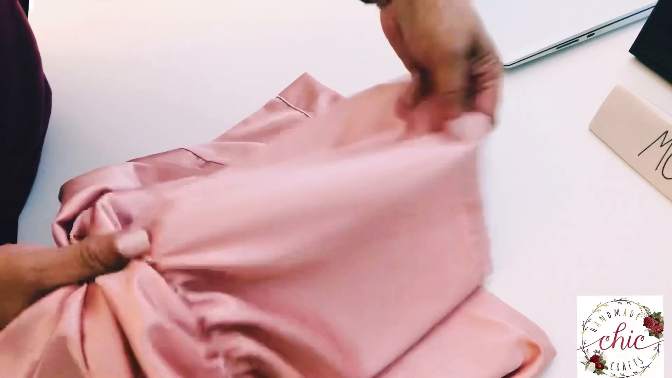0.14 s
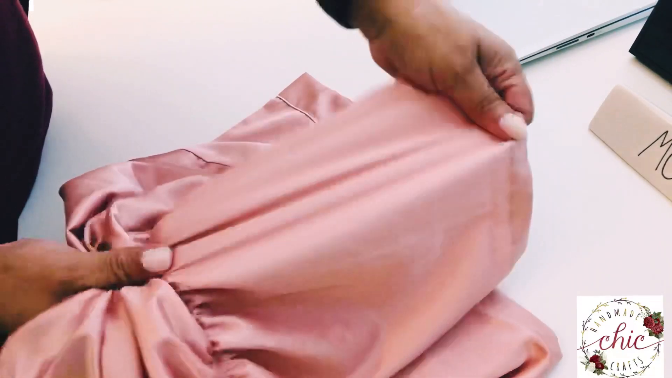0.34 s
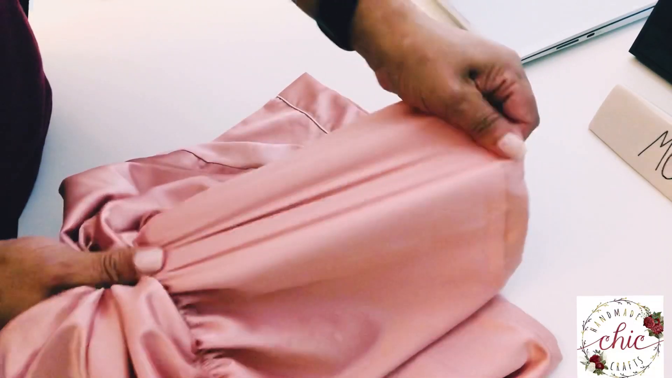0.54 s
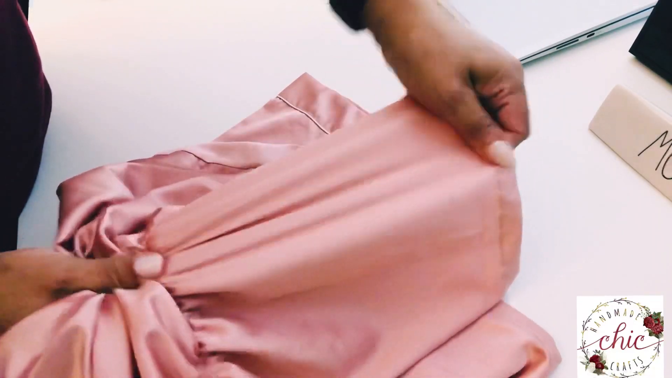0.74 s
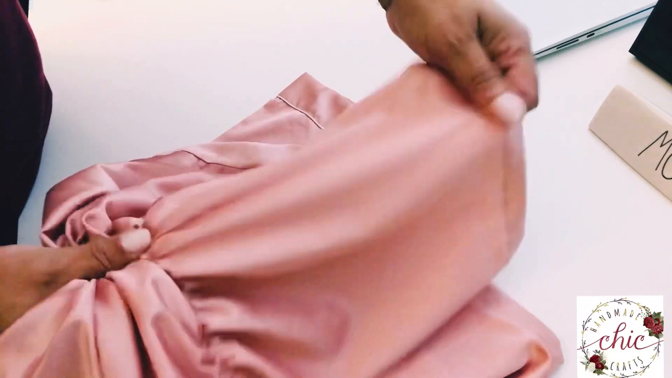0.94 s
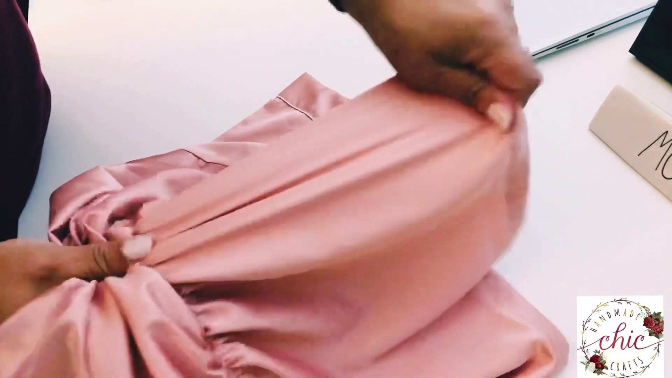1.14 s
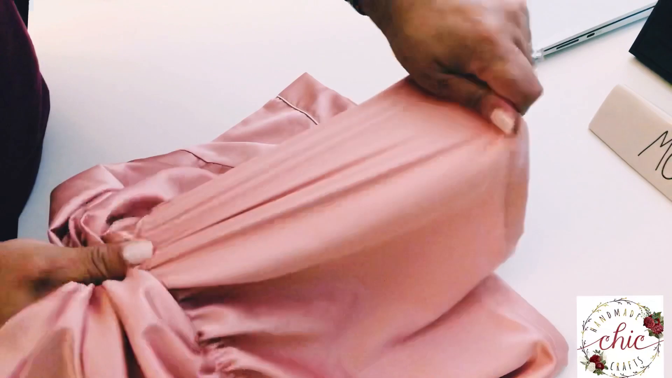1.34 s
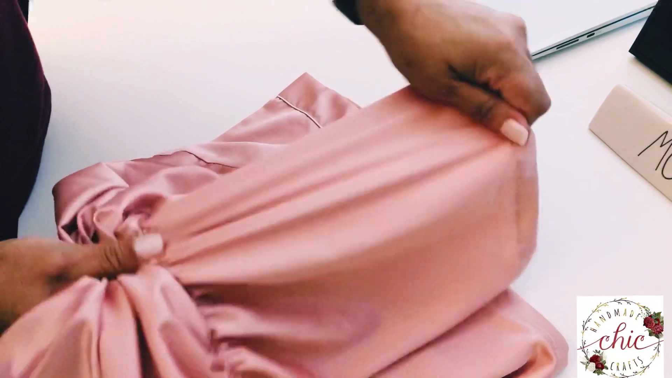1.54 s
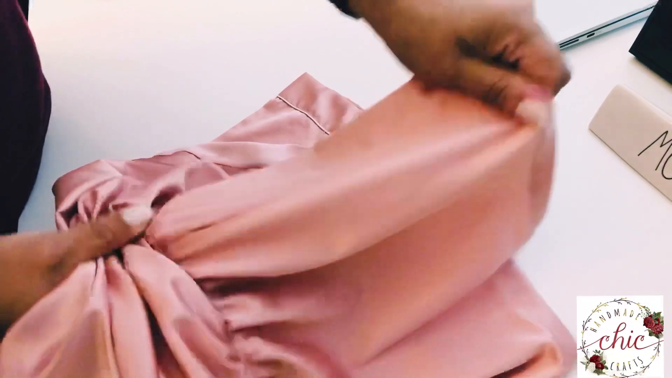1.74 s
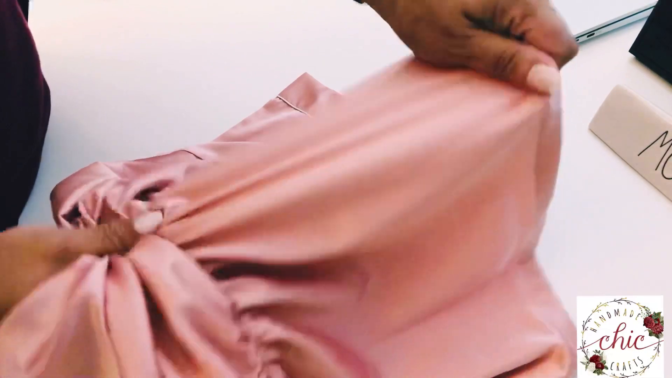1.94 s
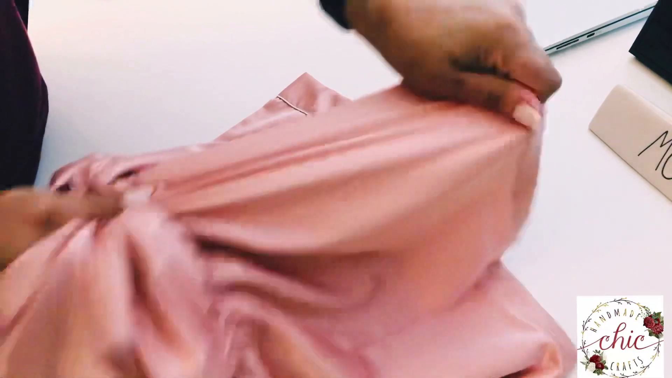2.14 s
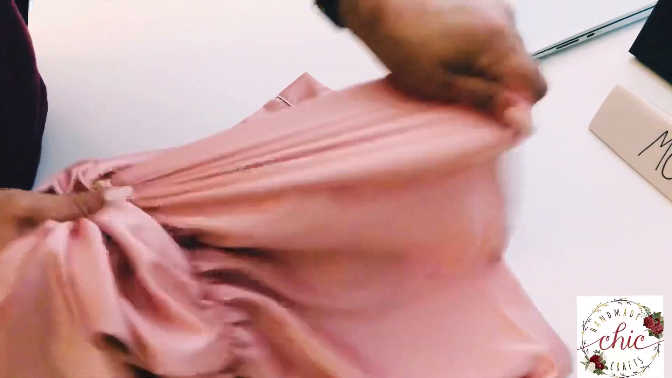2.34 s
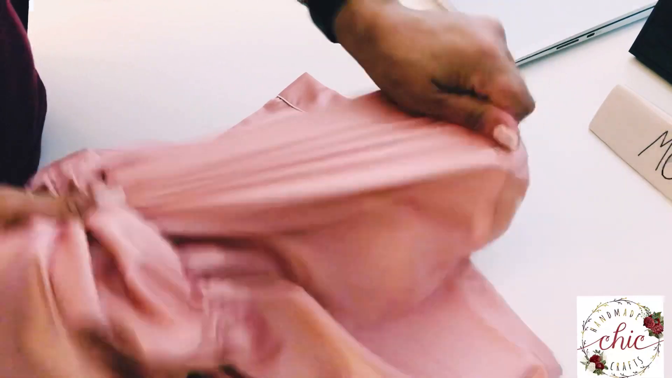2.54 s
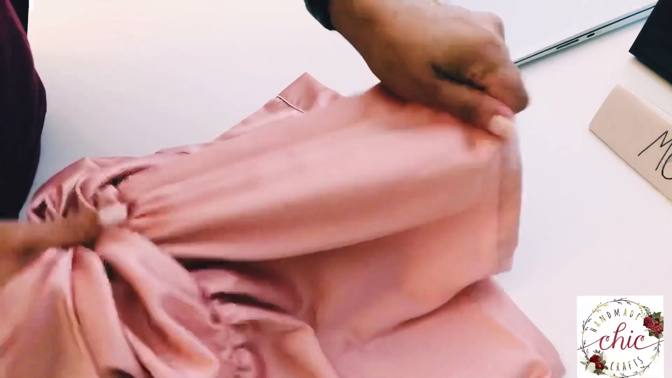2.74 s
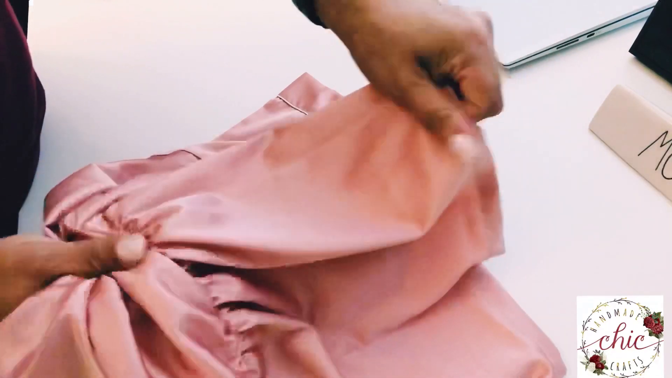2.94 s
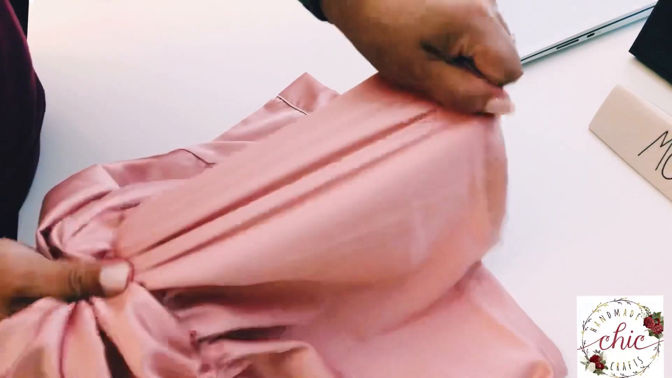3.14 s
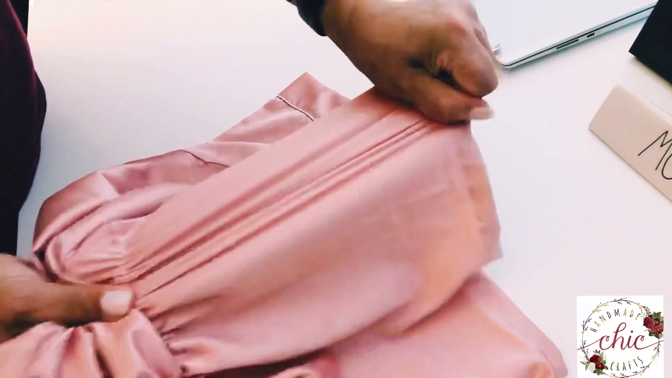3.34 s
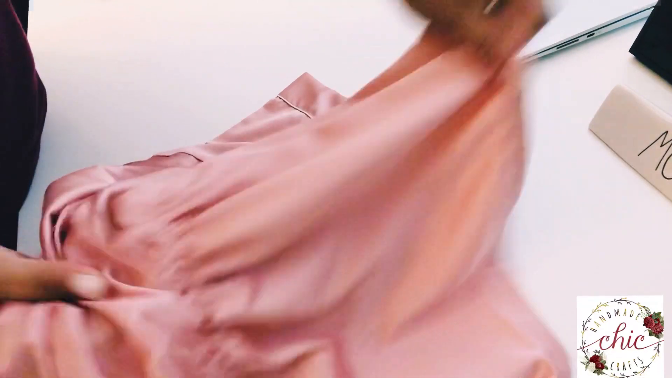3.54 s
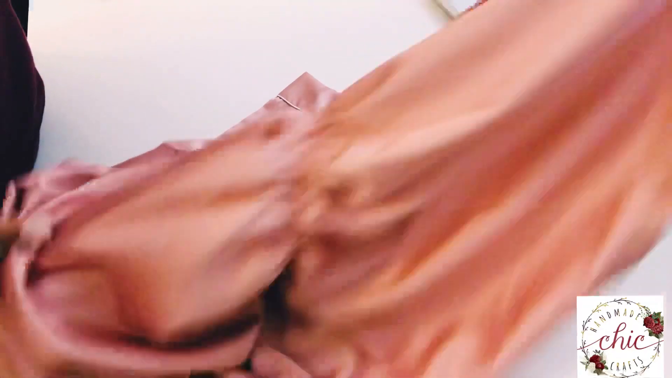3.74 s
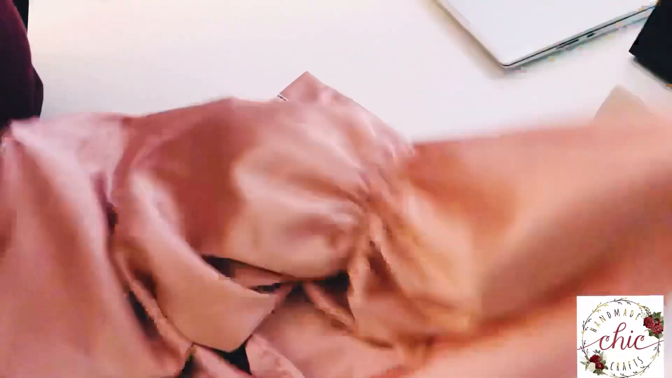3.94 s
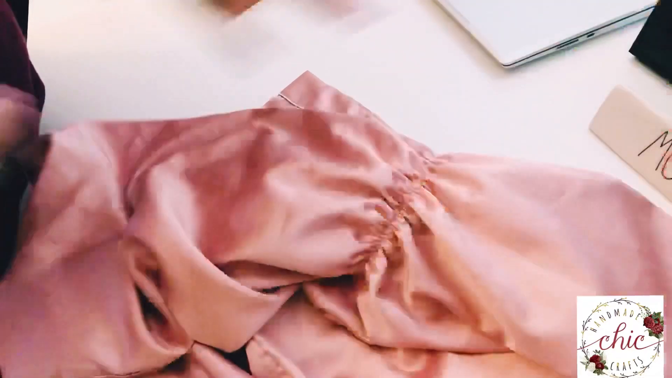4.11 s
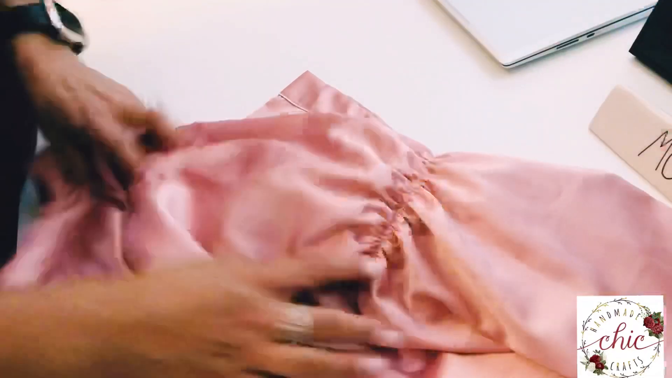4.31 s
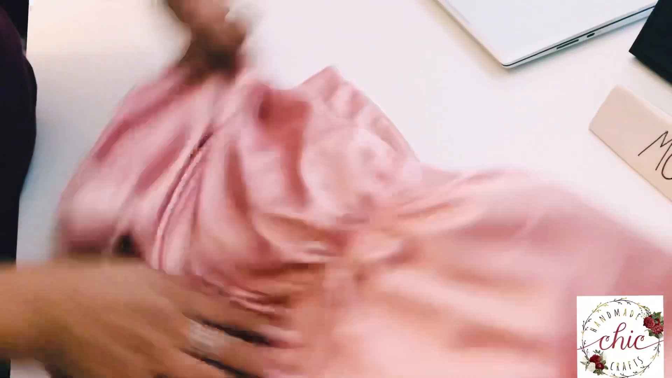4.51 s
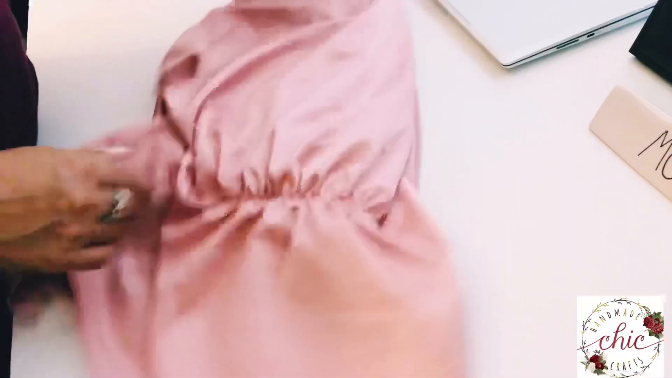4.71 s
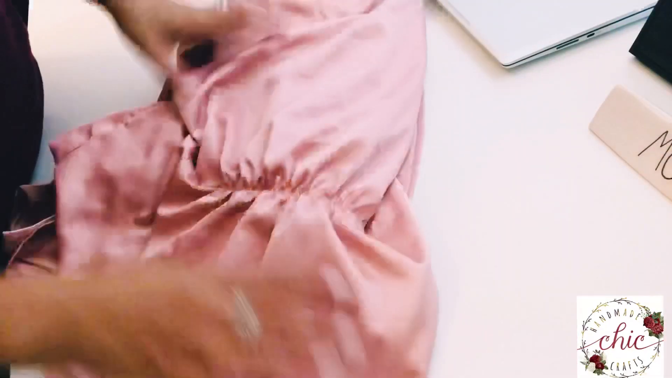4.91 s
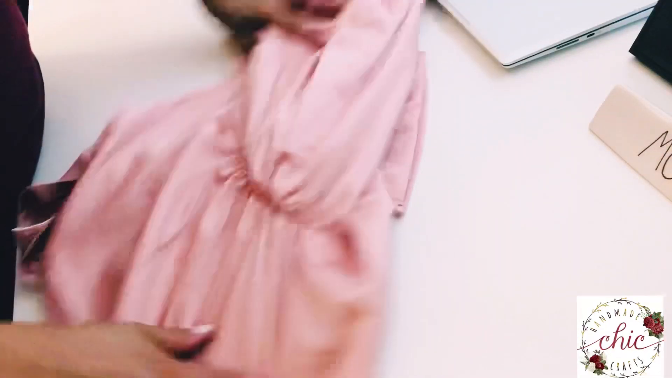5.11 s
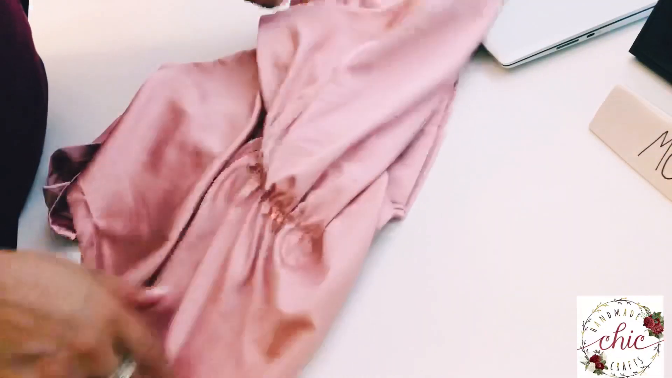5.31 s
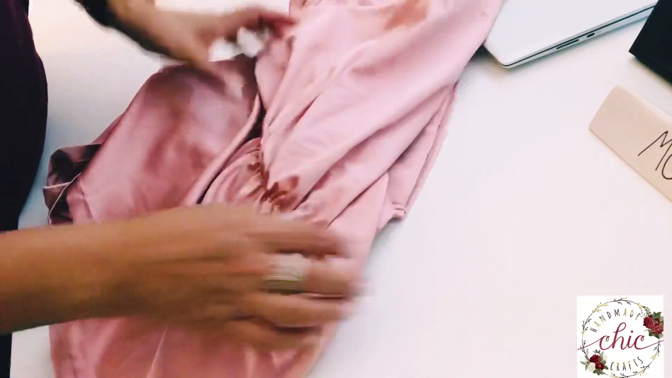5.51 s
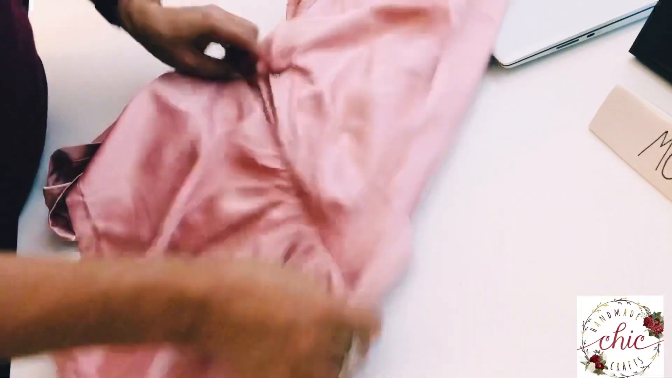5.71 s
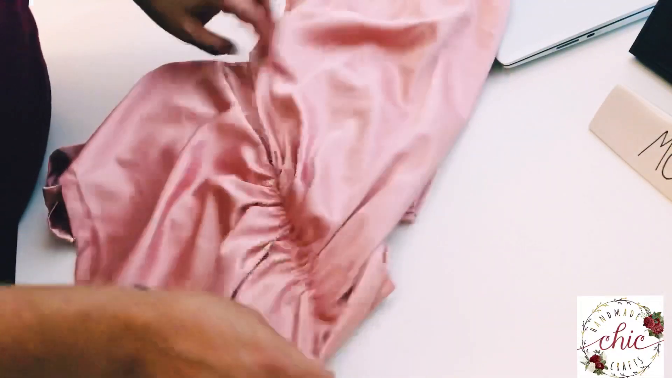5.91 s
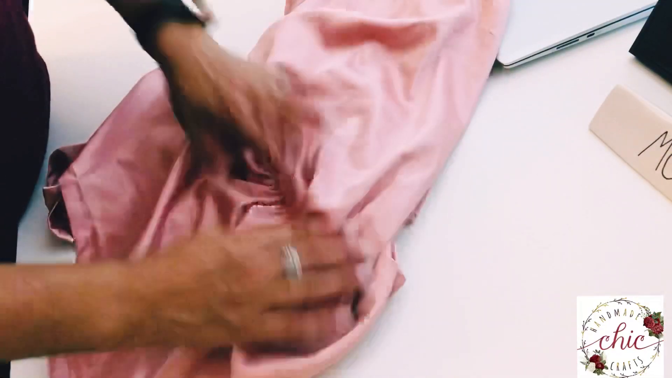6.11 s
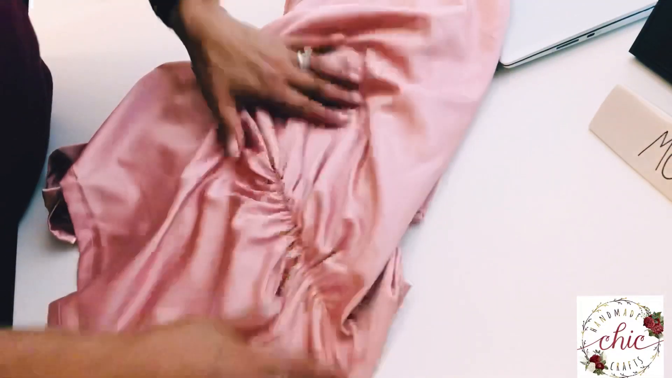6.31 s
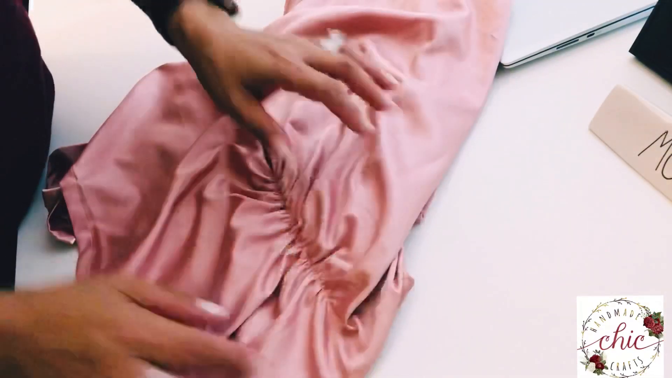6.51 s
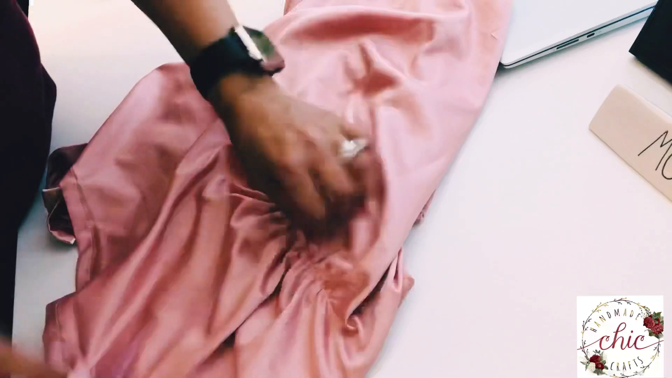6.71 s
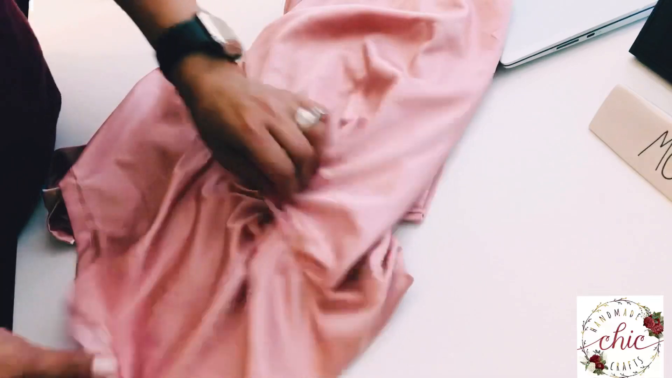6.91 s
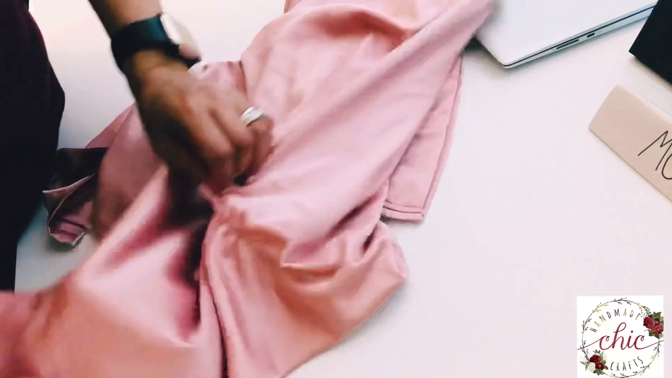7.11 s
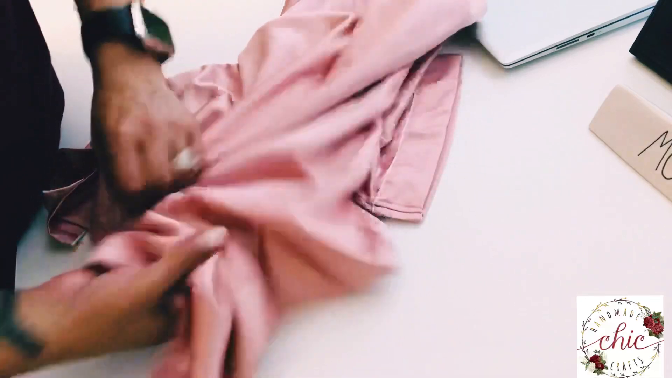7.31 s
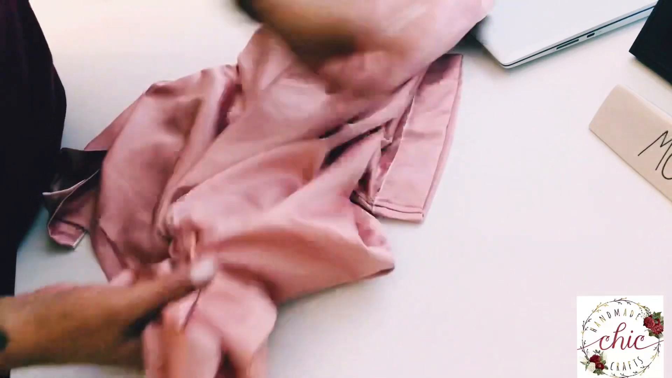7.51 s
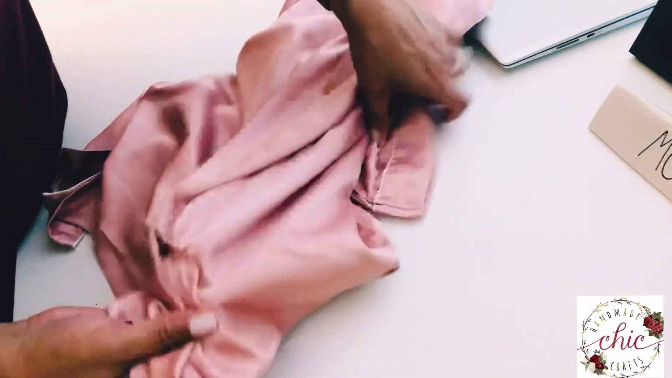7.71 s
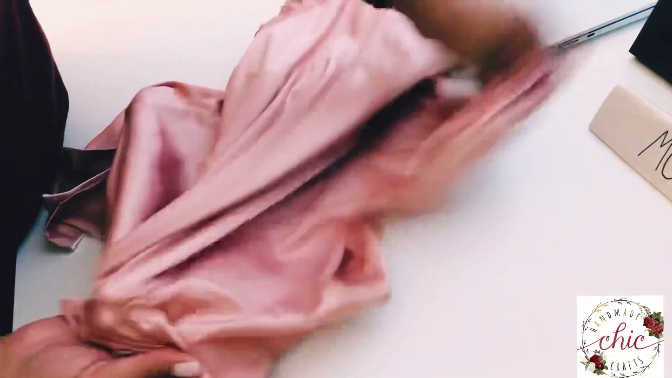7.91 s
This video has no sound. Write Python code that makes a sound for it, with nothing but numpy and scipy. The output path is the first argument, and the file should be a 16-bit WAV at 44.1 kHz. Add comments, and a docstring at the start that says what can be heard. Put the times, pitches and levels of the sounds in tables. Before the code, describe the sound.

Satin rustles faintly in someone's hands, then is jerked taut twice in quick succession with loud, sharp pops. A small tick follows. The cloth then slides across a table in soft swishes and hisses while hands pat the surface and fingernails click on it. It is all heard up close in a small quiet room, over a low ventilation rumble and faint hum.

```python
"""Satin dress on a table.

Close up, in a small quiet room. Sliding folds swish and hiss, the ribbed weave zips, threads catch.
Hands pat the table, nails tick on it, and the cloth is snapped taut several times.
Room resonances and short reflections follow the hits, over ventilation rumble and faint hum."""
import sys
import numpy as np
from scipy import signal
from scipy.fft import rfft, irfft, next_fast_len
from scipy.io import wavfile
from scipy.ndimage import uniform_filter1d, map_coordinates

SR = 44100
rng = np.random.default_rng(int(sys.argv[2]) if len(sys.argv) > 2 else 0)


def log_audio(samples):
    """Write samples as a 16-bit WAV file to the path given in sys.argv[1]."""
    # one column per channel
    frames = np.atleast_2d(samples).T
    # limit to full scale, then quantise
    limited = np.clip(frames, -1, 1)
    pcm = np.round(limited * 32767).astype(np.int16)
    wavfile.write(sys.argv[1], SR, pcm)


N = 350595

# Ventilation noise spectrum: freq_hz, gain_db
VENT_SPECTRUM = [(15, -38), (25, -3.5), (107, 2.5), (144, -3), (179, -5.5), (316, -6.5), (542, -16),
                 (769, -18), (981, -20.5), (1360, -24.5), (2330, -29.5), (3050, -29.5), (3580, -32.5),
                 (4690, -32.5), (15800, -45)]
# Hum lines: pitch_hz, level_db
HUM_LINES = [(118.5, -68.5), (157, -73.5), (312, -74), (479, -79.5)]
# Weave under a fold or nail: centre_s, length_s, level_db, start_hz, end_hz
ZIPS = [(0.02, 0.04, -58.5, 2200, 1890), (0.255, .06, -71, 2000, 2680), (4.505, 0.056, -61, 3045, 2420),
        (4.535, 0.048, -55.5, 2220, 1700), (4.88, 0.3, -75, 2130, 2041), (5.11, 0.3, -64, 4330, 4620),
        (5.18, 0.15, -63, 1960, 1550), (6.742, 0.055, -55, 5870, 5140), (7.644, .025, -60.5, 5190, 4500)]
# Cloth slides: peak_s, rise_s, fall_s, swish_db, hiss_db
SLIDES = [(0.14, 0.058, 0.068, -71.5, -76.5), (0.255, 0.027, 0.034, -65, -72),
          (0.43, 0.021, 0.027, -69.5, -77), (0.54, 0.028, 0.026, -75, -82),
          (0.79, 0.1, 0.044, -74.5, -76.5), (0.98, 0.14, .04, -79, -81), (1.18, 0.049, 0.025, -70.5, -79),
          (1.52, 0.062, 0.24, -78, -83), (1.66, 0.016, .06, -71, -70), (1.9, .1, 0.068, -78.5, -78.5),
          (2.05, .02, .03, -69, -72.5), (2.47, 0.054, 0.053, -70.5, -83), (2.78, 0.11, 0.17, -76.5, -80),
          (3.03, 0.038, 0.027, -70.5, -77), (3.22, 0.093, 0.25, -76.5, -80),
          (3.455, 0.021, 0.085, -62.5, -68), (3.75, 0.15, 0.079, -61, -71.5), (3.93, 0.19, .15, -67, -79),
          (4.35, .08, .07, -65, -74), (4.52, 0.2, .2, -59, -67.5), (5.06, 0.12, 0.11, -59, -68),
          (5.19, 0.12, 0.092, -62.5, -68.5), (5.62, 0.053, .15, -60, -71.5),
          (5.78, 0.045, 0.096, -64, -71.5), (6.135, 0.03, 0.13, -59.5, -66.5),
          (6.269, 0.085, 0.063, -64.5, -63.5), (6.745, 0.076, 0.07, -64, -70), (7.0, 0.18, 0.2, -68.5, -80),
          (7.29, 0.25, 0.24, -65.5, -76), (7.73, 0.11, 0.12, -64, -74), (7.91, 0.06, .15, -63, -73)]
# Fold-on-fold spectrum: freq_hz, gain_db
SWISH_SPECTRUM = [(300, -32), (800, 0.5), (1300, 1.5), (2000, 1), (3200, -1.5), (4500, -2), (7000, -11.5),
                  (9000, -17.5), (16000, -38)]
# Cloth-on-table spectrum: freq_hz, gain_db
RUB_SPECTRUM = [(80, -14), (250, -5.5), (500, -1), (900, -5), (1600, -10.5), (4000, -16.5), (16000, -49)]
# Fine weave spectrum: freq_hz, gain_db
HISS_SPECTRUM = [(1500, -6), (4000, -0.5), (6000, 2), (7700, 2), (8500, -3.5), (11000, -2), (15500, -2.5)]
# Hand taps on the table and one sharp tick of cloth pulled taut (at 3.2 s):
# start_s, level_db, pitch_hz, decay_cycles, click_db, thump_db
TAPS = [(0.345, -53.5, 860, 1.2, -55, -66), (1.925, -42.5, 312, 0.49, -60, -52),
        (3.1995, -37.5, 830, 2.3, -34, -56), (4.2375, -54, 950, .9, -47.5, -62),
        (4.361, -39, 170, 0.79, -64, -43), (4.558, -38, 476, 0.81, -66, -42),
        (4.9572, -42, 825, 0.48, -63, -39), (4.982, -40, 140, 0.66, -62, -46),
        (5.574, -36.5, 473, 0.59, -33, -46), (5.758, -39.5, 267, 0.65, -64, -37.5),
        (5.782, -37.5, 674, 0.9, -41, -45), (6.127, -40, 517, .6, -50, -39.5),
        (6.1673, -32.5, 850, 0.67, -48, -35), (6.693, -38, 440, 0.43, -44, -53),
        (6.7002, -36, 387, 1.1, -39.5, -51), (6.7132, -35, 1050, 2.1, -30.5, -53),
        (6.717, -31, 309, 3.3, -46, -37), (6.728, -33, 614, 1.6, -49, -31),
        (7.18, -32.5, 605, 0.75, -64, -40), (7.637, -32.5, 318, 1.24, -35, -46),
        (7.646, -43, 620, 1.8, -44, -60), (7.711, -38, 576, 1.8, -44, -56),
        (7.935, -37.5, 886, 0.9, -48, -42)]
# Tap click spectrum: freq_hz, gain_db
CLICK_SPECTRUM = [(300, 10.0), (1200, 3.5), (3200, -9.0), (5200, -1.5), (7500, -6.5), (9000, -13.5),
                  (15000, -20.5)]
# Room resonances: pitch_hz, gain_db, t60_s
ROOM_MODES = [(160, -3, 0.28), (209, 4, 0.44), (314, 7, 0.15), (397, -9, 0.14), (434, -14, 0.31),
              (590, 3, 0.42), (710, 5, 0.29), (764, -10, 0.15), (845, -8, 0.25), (966, -10, 0.12),
              (1050, 14, 0.17), (1500, -18, 0.14), (1960, -9, 0.2), (3120, 11, .12)]
# Room decay: freq_hz, t60_s
ROOM_DECAY = [(100, 0.34), (500, 0.18), (1500, 0.28), (4000, 0.5), (12000, 0.17)]
# Reflection colour: freq_hz, gain_db
WALL_SPECTRUM = [(60, 11), (200, -16), (500, 3), (1000, -6), (2000, -7), (3000, -11.5), (8000, -6.5),
                 (16000, 9)]
# Cloth jerked taut: taut_s, level_db, pitch_hz, crack_db, slack_s
SNAPS = [(2.2962, -14.5, 440.6, -31, 0.0057), (2.4837, -17, 448, -28, 0.0033),
         (3.0226, -39, 350, -60, 0.011)]
# Sheet stops, edge whips over, panel swings back:
# delay_s, gain_db, pitch_ratio, decay_cycles, crack_gain_db
SNAP_STAGES = [(0, 1.5, 1.0, 0.97, 5.5), (.0034, 0, 2.12, 1.3, 1), (.0075, -7.5, 0.49, 0.81, -22)]
# Cloth crack spectrum: freq_hz, gain_db
CRACK_SPECTRUM = [(300, -19), (1000, 6), (1900, 13), (3500, 5.5), (7000, -15.5), (15000, -26)]


def amp(db):
    """dB to gain."""
    return 10 ** (np.asarray(db) / 20)


def unit_rms(x):
    """Scale to rms 1."""
    return x / np.sqrt(np.mean(x ** 2) + 1e-20)


def log_interp(points, hz):
    """Interpolate on a log frequency axis."""
    knots_hz, values = np.transpose(points)
    return np.interp(np.log(hz + 1), np.log(knots_hz + 1), values)


def wobble(rate_hz):
    """Smooth random curve."""
    knots = rng.standard_normal(int(N * rate_hz / SR) + 4)
    return map_coordinates(knots, [np.arange(N) * rate_hz / SR])


def filtered(x, response):
    """FFT filter with gain response(hz)."""
    size = next_fast_len(len(x) + 8192)
    return irfft(rfft(x, size) * response(np.fft.rfftfreq(size, 1 / SR)), size)[:len(x)]


def coloured(x, spectrum):
    """Apply a spectrum; rms 1."""
    return unit_rms(filtered(x, lambda hz: amp(log_interp(spectrum, hz))))


def add(track, start_s, sound):
    """Mix in place."""
    part = track[max(round(start_s * SR), 0):][:len(sound)]
    part += sound[:len(part)]


def ventilation():
    """Air rumble and slightly unsteady hum."""
    t = np.arange(N) / SR
    hum = np.zeros(N)
    for hz, db in HUM_LINES:
        peak = np.sqrt(2) * amp(db + 1.65 * wobble(13))
        hum += peak * np.sin(2 * np.pi * hz * t + 0.83 * wobble(9))
    return hum + amp(-60.5) * coloured(rng.standard_normal(N), VENT_SPECTRUM)


def strokes(rows, width_ratio):
    """Swells of friction noise, each in a band gliding with the stroke's speed."""
    out = np.zeros(N)
    for centre_s, length_s, db, start_hz, end_hz in rows:
        n = int(length_s * SR)
        noise = rng.standard_normal(SR // 2)
        band = unit_rms(filtered(noise, lambda hz: 1 / (1 + (hz / (width_ratio * start_hz)) ** 2)))[:n]
        carrier = np.sqrt(2) * np.sin(2 * np.pi * np.cumsum(np.geomspace(start_hz, end_hz, n)) / SR)
        add(out, centre_s - length_s / 2, amp(db) * np.hanning(n) * band * carrier)
    return out


def slide_levels(held_swish_db=-83, held_hiss_db=-84, laid_down_s=3, settle_db_per_s=40):
    """Swish and hiss envelopes in dB: slides swell over the stir of held cloth, which later settles."""
    t = np.arange(N) / SR
    stir_db = 0.5 * wobble(12) - settle_db_per_s * np.maximum(t - laid_down_s, 0)
    swish_power = amp(held_swish_db + stir_db) ** 2
    hiss_power = amp(held_hiss_db + stir_db) ** 2
    for peak_s, rise_s, fall_s, swish_db, hiss_db in SLIDES:
        from_peak = np.abs(t - peak_s) / np.where(t < peak_s, rise_s, fall_s)
        speed = np.exp(-np.minimum(from_peak, 10) ** 1.74)  # exponent: 1 pointed, 2 rounded
        swish_power += (amp(swish_db) * speed) ** 2
        hiss_power += (amp(hiss_db) * speed) ** 2
    return 10 * np.log10(swish_power), 10 * np.log10(hiss_power)


def friction(catches_per_s, grain, patchy_db):
    """Countless thread slips and fewer large catches, coloured in patches by shifting folds."""
    catches = (rng.random(N) < catches_per_s / SR) * rng.standard_normal(N)
    bins = signal.stft(rng.standard_normal(N) + grain * unit_rms(catches), nperseg=512)[2]
    patches = uniform_filter1d(rng.standard_normal(bins.shape), size=5, axis=0)
    patches = uniform_filter1d(patches, size=16, axis=1)
    return signal.istft(bins * amp(patchy_db * unit_rms(patches)), nperseg=512)[1][:N]


def satin(swish_db, hiss_db):
    """Folds swish over a dull rub on the table; the weave hisses."""
    flutter = amp(0.98 * wobble(45))
    swish = coloured(friction(catches_per_s=330, grain=0.31, patchy_db=2.2), SWISH_SPECTRUM)
    rub = coloured(friction(catches_per_s=60, grain=0.35, patchy_db=3.5), RUB_SPECTRUM)
    hiss = coloured(friction(catches_per_s=90, grain=0.3, patchy_db=1.0), HISS_SPECTRUM)
    rub_db = 0.55 * swish_db - 29.0  # grows less with speed: fast slides are brighter
    return flutter * (amp(swish_db) * swish + amp(rub_db) * rub + amp(hiss_db + 3.5) * hiss)


def thread_ticks(hiss_db, rate_per_s=6, base_db=-53, spread_db=2):
    """Single threads catch and release, harder in fast slides."""
    level_db = base_db + (hiss_db - hiss_db.mean()) / 2 + spread_db * rng.uniform(-1, 1, N)
    clicks = (rng.random(N) < rate_per_s / SR) * amp(level_db)
    return filtered(clicks, lambda hz: amp(log_interp(HISS_SPECTRUM, hz)))


def blows(rows, flap_db, flap_t60_s, crack_t60_s, crack_spectrum):
    """Each blow: a damped air swing (softer contact, lower pitch), a cloth flap, a short crack."""
    out, t = np.zeros(N), np.arange(SR // 8) / SR
    for start_s, db, hz, decay_cycles, crack_db in rows:
        cycles = hz * t
        swing = np.sin(2 * np.pi * cycles) * np.exp(-cycles / decay_cycles) * (1 - np.exp(-cycles / 0.1))
        flap = filtered(rng.standard_normal(len(t)), lambda f: (f / hz) / (1 + (f / (0.69 * hz)) ** 3))
        flap = unit_rms(flap) * amp(flap_db - 60 * t / flap_t60_s) * (1 - np.exp(-cycles))
        crack = coloured(rng.standard_normal(len(t)), crack_spectrum) * amp(-60 * t / crack_t60_s)
        add(out, start_s, amp(db) * (1.34 * swing + flap) + 0.5 * amp(crack_db) * crack)
    return out


def taps(thump_delay_s=0.00618, thump_hz=153, thump_cycles=0.58):
    """Hand taps and one tick of taut cloth: a sharp onset, then a low thump."""
    onsets = [row[:5] for row in TAPS]
    thumps = [(start_s + thump_delay_s, db, thump_hz, thump_cycles, db - 24) for start_s, *_, db in TAPS]
    return blows(onsets + thumps, flap_db=-9.5, flap_t60_s=0.081,
                 crack_t60_s=0.025, crack_spectrum=CLICK_SPECTRUM)


def room_ring(hits):
    """Room resonances ringing on after each hit."""
    t = np.arange(SR // 2) / SR
    modes = sum(amp(db - 60 * t / t60_s) * np.sin(2 * np.pi * hz * t) for hz, db, t60_s in ROOM_MODES)
    return signal.fftconvolve(hits, modes / np.linalg.norm(modes))[:N]


def room_reflections(hits, early_db=-36, early_t60_s=0.024, tail_db=-36.5, delay_s=0.004):
    """Near surfaces, then walls. A new response per block: paths change as the hands move."""
    out, block = np.zeros(N), SR // 5
    for start in range(0, N, block):
        hz, t, bins = signal.stft(rng.standard_normal(SR // 2), SR, nperseg=256)
        early = amp(early_db - 60 * t / early_t60_s)
        tail = amp(tail_db - 60 * t / log_interp(ROOM_DECAY, hz)[:, None])
        colour = amp(log_interp(WALL_SPECTRUM, hz))[:, None]
        response = signal.istft(bins * (early + tail) * colour, SR, nperseg=256)[1]
        add(out, start / SR + delay_s, signal.fftconvolve(hits[start:start + block], response))
    return out


def cloth_snaps(whip_s=0.03, low_cut_hz=110):
    """The sheet whips through the air and snaps taut; air slips round it, so little bass radiates."""
    whips, jerks = [], []
    for taut_s, db, hz, crack_db, slack_s in SNAPS:
        whips.append((taut_s, whip_s, db - 23.5, hz * 1.178, hz * 2.85))
        jerks.append((taut_s - slack_s, db - 9.5, hz * 2.3, 0.82, db - 20))  # slack runs out
        for delay_s, gain_db, ratio, cycles, crack_gain_db in SNAP_STAGES:
            jerks.append((taut_s + delay_s, db + gain_db, hz * ratio, cycles, crack_db + crack_gain_db))
    snaps = blows(jerks, flap_db=-12, flap_t60_s=0.026,
                  crack_t60_s=0.0075, crack_spectrum=CRACK_SPECTRUM)
    return strokes(whips, width_ratio=1.0) + filtered(snaps, lambda hz: 1j * hz / (1j * hz + low_cut_hz))


def scene():
    """Mono mix; only the hits excite the room."""
    swish_db, hiss_db = slide_levels()
    hits = cloth_snaps() + taps() + thread_ticks(hiss_db)
    reflections = room_reflections(hits)
    rubbing = satin(swish_db, hiss_db) + strokes(ZIPS, width_ratio=0.14)
    return hits + amp(-30.5) * room_ring(hits) + reflections + rubbing + ventilation()


def record(dry):
    """Microphone low cut, then a hard band limit."""
    low_cut_hz, top_hz = 55, 15850
    low_cut = signal.butter(4, low_cut_hz, "highpass", fs=SR, output="sos")
    return filtered(signal.sosfilt(low_cut, np.ravel(dry)), lambda hz: hz < top_hz)[None]


dry = scene()
out = record(dry)
log_audio(out)
```